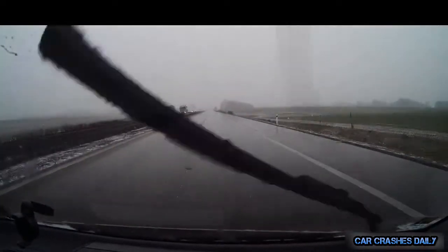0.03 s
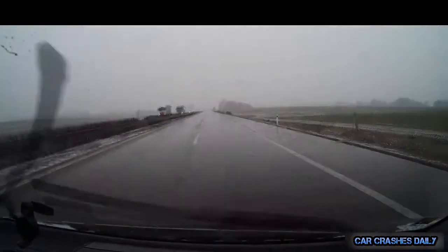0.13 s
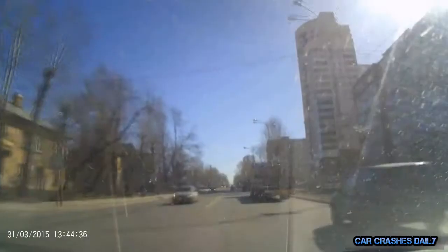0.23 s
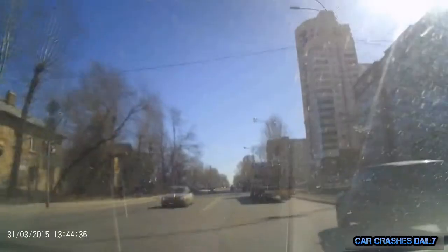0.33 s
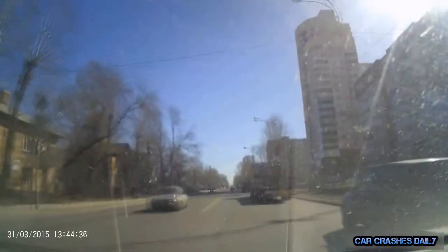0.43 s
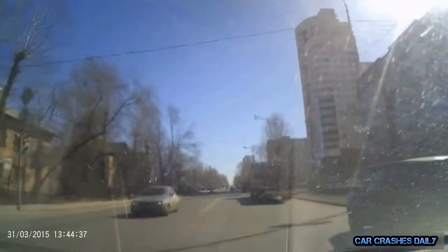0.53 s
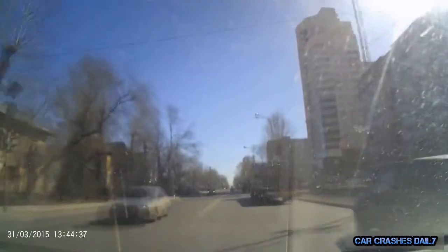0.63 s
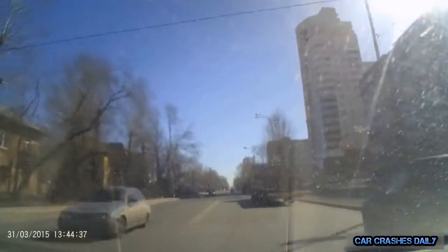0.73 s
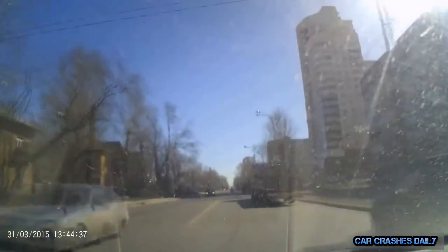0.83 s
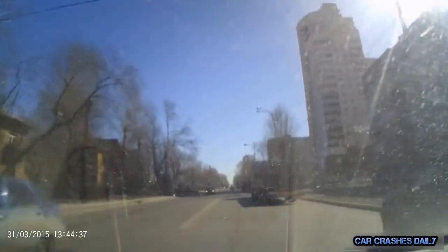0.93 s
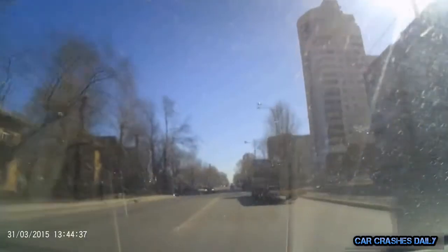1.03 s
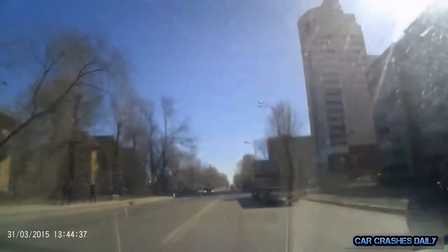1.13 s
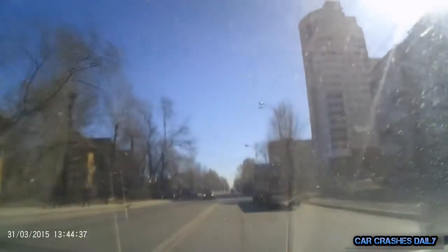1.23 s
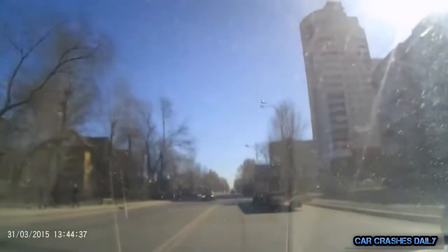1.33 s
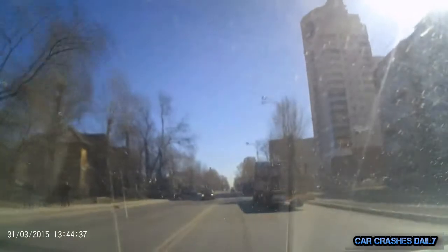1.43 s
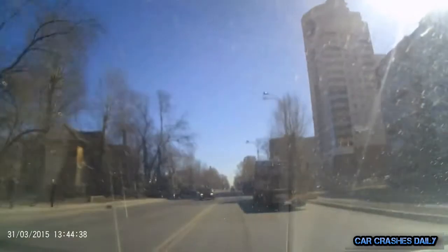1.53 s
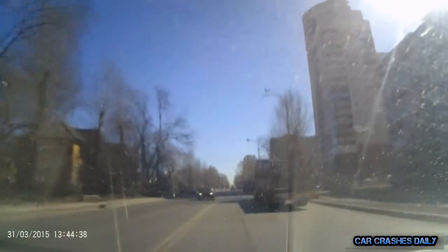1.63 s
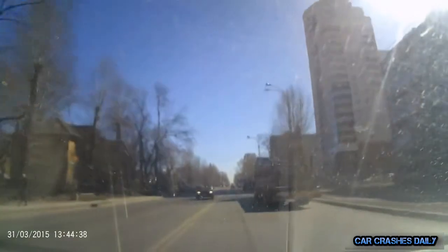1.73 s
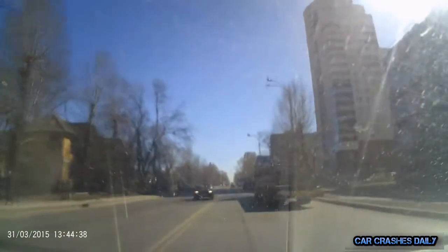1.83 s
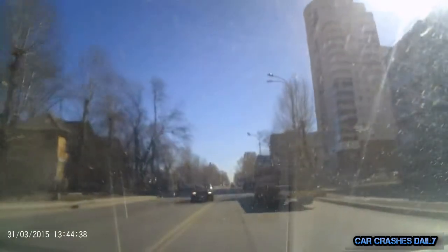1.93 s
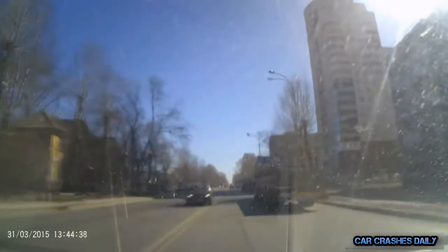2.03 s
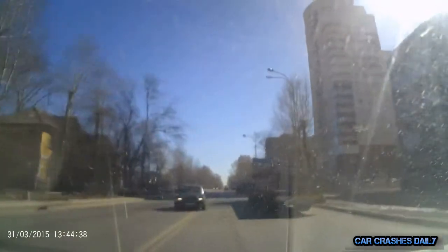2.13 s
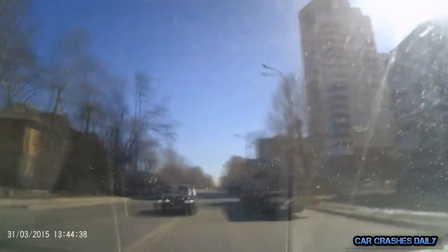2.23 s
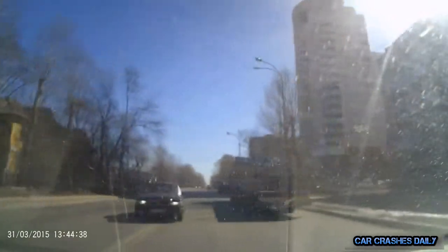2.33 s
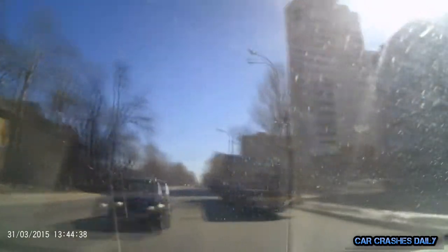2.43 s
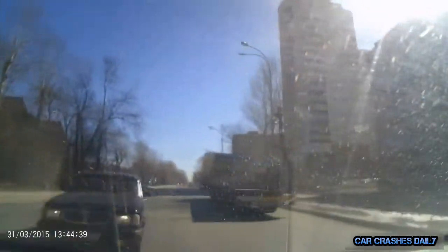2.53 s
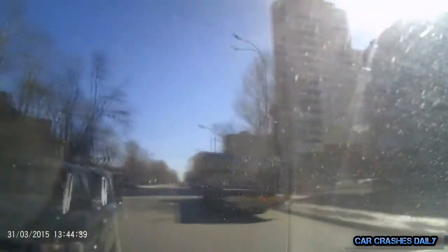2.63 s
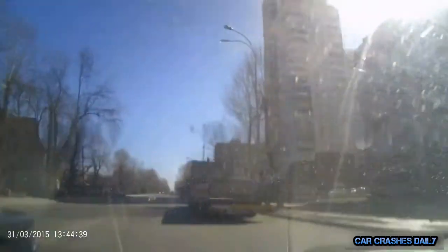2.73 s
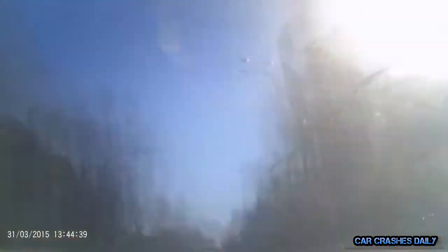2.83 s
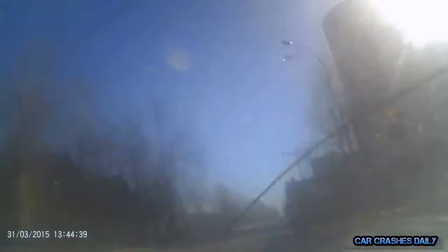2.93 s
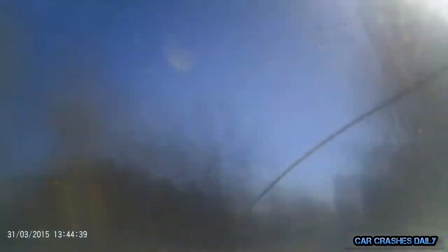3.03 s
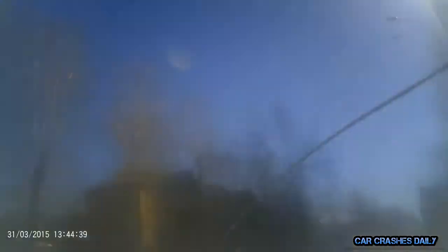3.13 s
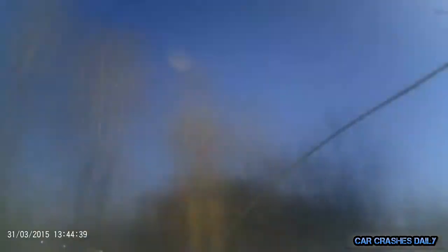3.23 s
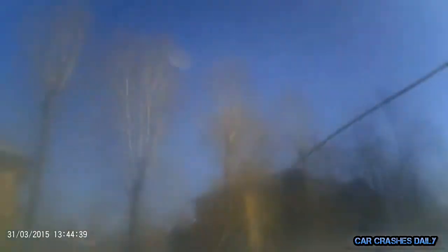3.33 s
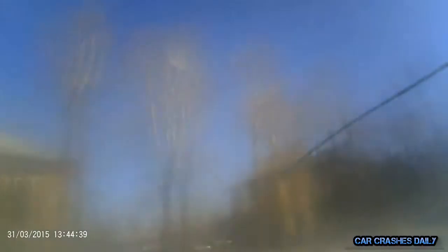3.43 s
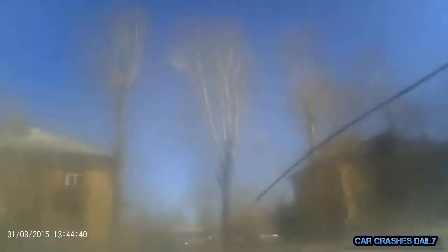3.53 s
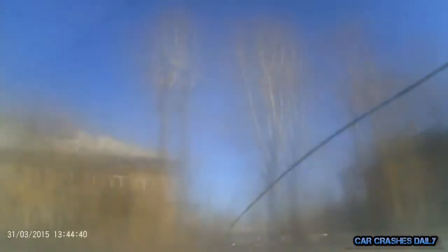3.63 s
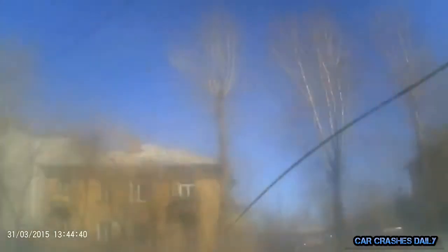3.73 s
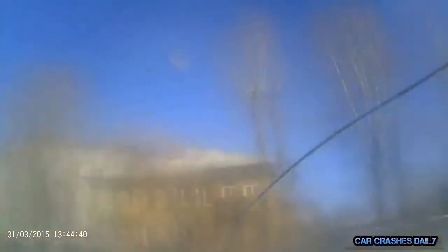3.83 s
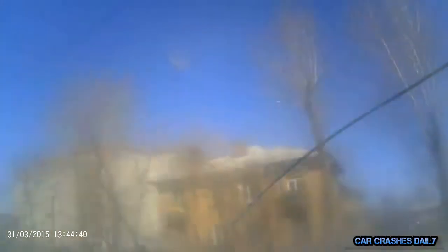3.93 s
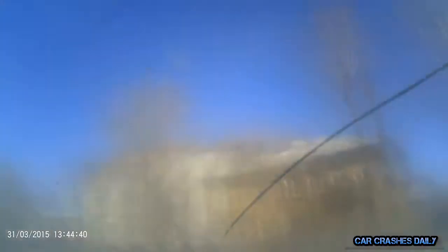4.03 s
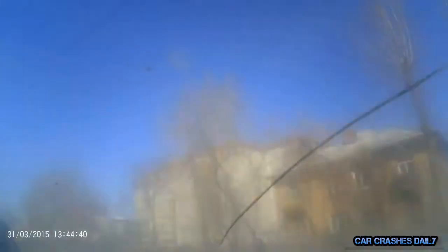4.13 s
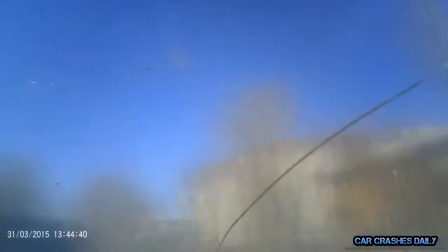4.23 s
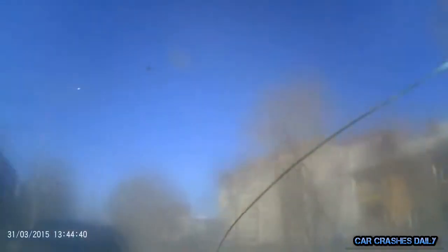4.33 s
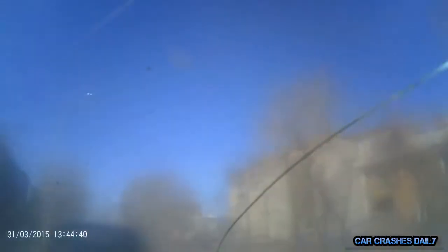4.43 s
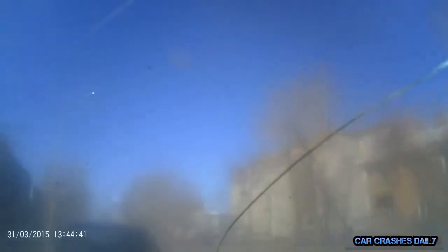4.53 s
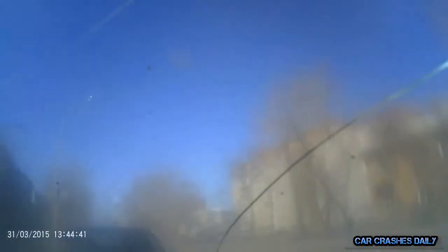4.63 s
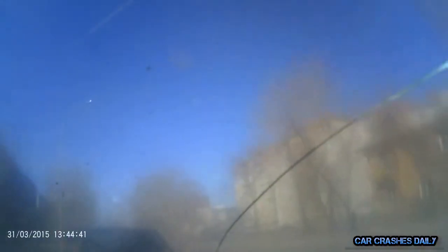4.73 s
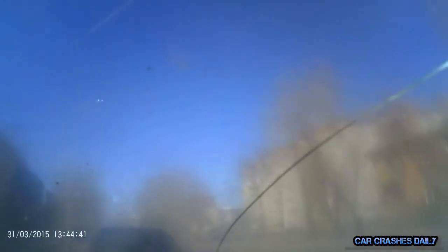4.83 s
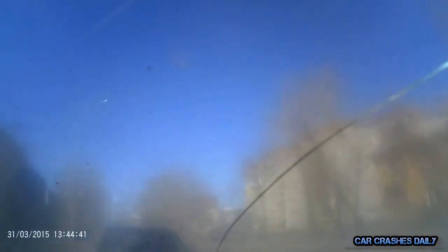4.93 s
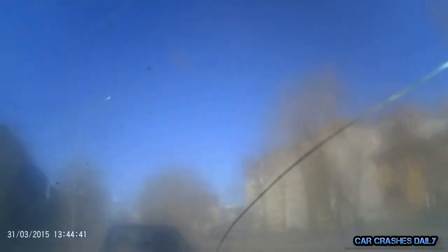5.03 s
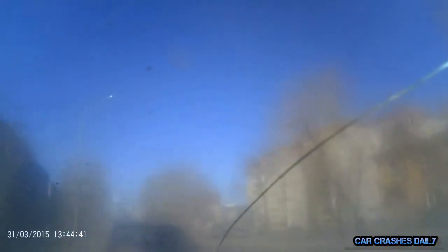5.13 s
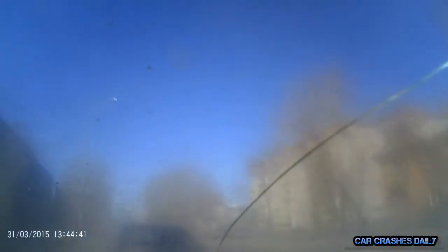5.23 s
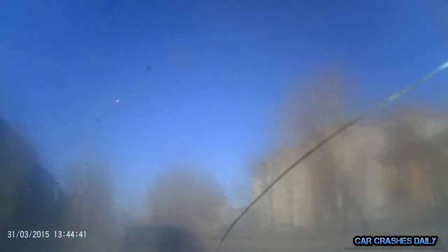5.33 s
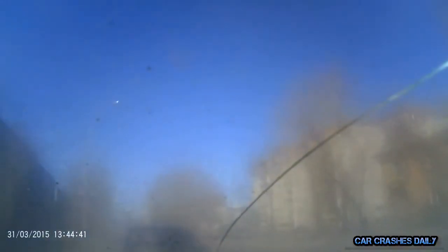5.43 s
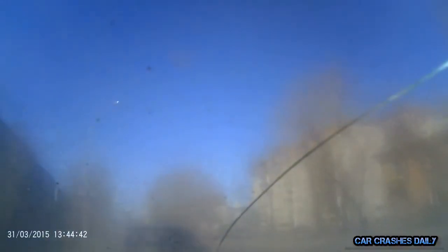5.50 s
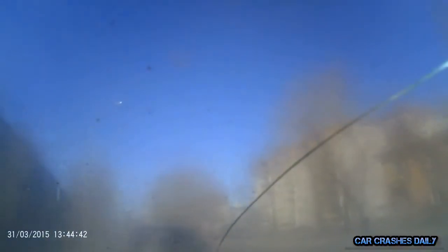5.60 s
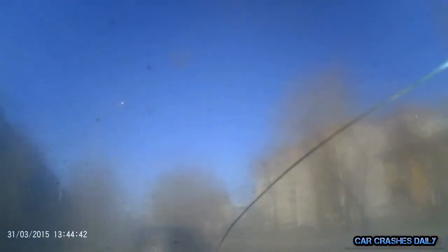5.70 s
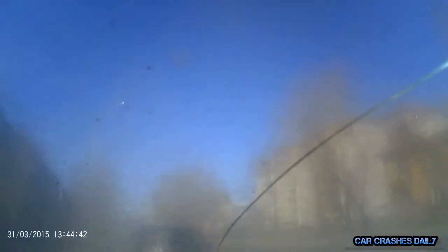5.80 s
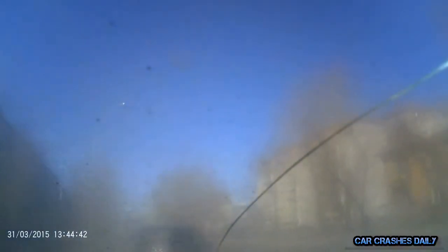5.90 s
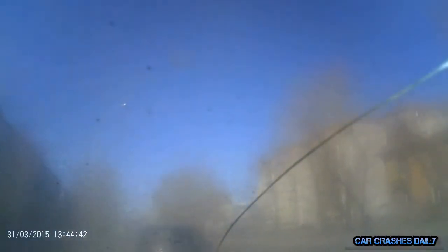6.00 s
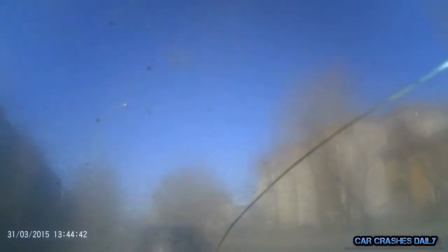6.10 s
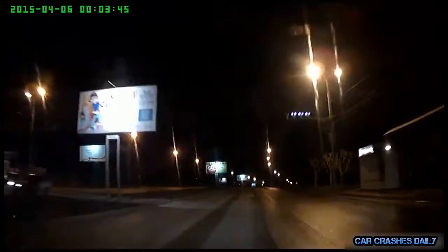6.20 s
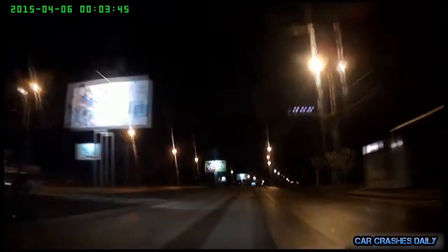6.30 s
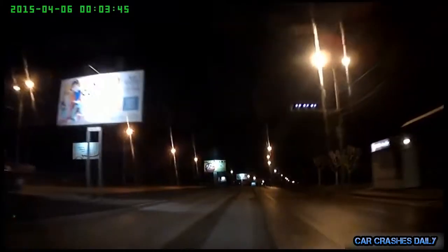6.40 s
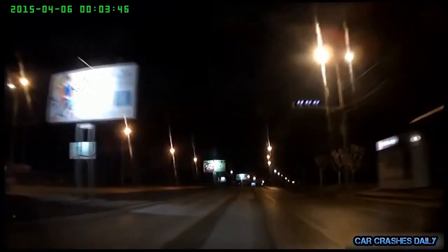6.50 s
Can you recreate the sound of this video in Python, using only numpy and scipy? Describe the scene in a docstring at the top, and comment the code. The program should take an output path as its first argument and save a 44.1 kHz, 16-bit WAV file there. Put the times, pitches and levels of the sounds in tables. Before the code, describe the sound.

From about 0.3 seconds, a low, steady tyre roar fills the cabin of a moving car, with a faint engine hum and gear whine. At 2.5 seconds comes a head-on collision: two crushing blows of buckling metal in quick succession, so loud that the microphone distorts. From 2.8 seconds the car spins, its body rocking with a deep judder as panels scrape and glass and trim clack and tinkle down, the glass thickest near 3.8 seconds. Hoarse tyre squeals, each falling in pitch, run from 3 to 4.4 seconds. Heavy thumps and short grinds of the underside continue until about 5 seconds, with a hard jolt near 4.4, followed by dry chattering trim. As the clatter fades, the engine grows louder around 5 seconds, then sinks in pitch. A soft rush rises from 5.5 seconds, and everything cuts off at 6.3 seconds.

```python
"""A town street, heard from behind the windscreen of a moving car that is hit head-on.
Tyres roar and the engine hums until two crushing blows overload the microphone. The car spins on
squealing tyres, its body rocking, thumping and scraping while glass and trim rattle down.
These noises die away as it slows, and the engine, louder by now, runs down.
A soft background rush comes up as the microphone's level recovers after the crash."""
import sys
import numpy as np
from scipy import signal
from scipy.fft import rfft, irfft
from scipy.io import wavfile

SR = 44100
rng = np.random.default_rng(int(sys.argv[2]) if len(sys.argv) > 2 else 0)


def unload_wav(signal):
    """Save mono or channel-first audio to the path in sys.argv[1] as 16-bit WAV at rate SR, clipped to [-1, 1]."""
    wavfile.write(
        sys.argv[1],
        SR,
        np.round(np.clip(np.atleast_2d(signal).T, -1, 1) * 32767).astype(np.int16),
    )


N = 289296
T = np.arange(N) / SR
START_S, END_S = 0.315, 6.32
SPIN_S, SLOWS_S, REST_S = 2.773, 3.55, 6.42  # the car starts to spin, starts to slow, comes to rest

# Levels in a table are relative to each other. A spectrum says how strong each frequency is.
# Spectrum of tyre roar inside the car: f/Hz, level/dB
ROAD_SPECTRUM = [(18, 3), (69, 0), (137, -9), (162, -20), (220, -18.5), (261, -23.5), (376, -27),
                 (875, -35), (2620, -55.5), (10400, -80.5), (15000, -82)]
# Resonances of the cabin and the case around the microphone: f/Hz, width/Hz, level/dB
CABIN_RESONANCES = [(864, 24, 4), (1430, 180, 0), (3980, 280, 7), (9760, 2500, 18.5)]
# How fast the engine fires and how loud it is: t/s, f/Hz, level/dB
ENGINE_CURVE = [(0.3, 72.9, -41), (4.6, 79.8, -28.5), (4.87, 98.2, -20.5), (5.12, 102.5, -18.5),
                (5.3, 96.1, -25), (5.64, 97.4, -19.5), (5.98, 81.8, -24), (6.15, 75.86, -22.5),
                (6.32, 69.8, -21)]
# Engine harmonics (1, 2, 3... times the firing rate): level/dB
ENGINE_HARMONICS = [-27, -11, -16, -16, -22, -21.5]
# Bursts of buckling metal: t/s, length/s, level/dB, f/Hz above which the crunch fades
CRUNCHES = [(2.542, 0.006, 2, 860), (2.549, 0.0028, 3, 895), (2.555, 0.0017, -1.5, 900),
            (2.561, 0.0095, 9.5, 206), (2.576, 0.0014, -1.5, 1950), (2.582, 0.009, 8.5, 449),
            (2.659, 0.044, -4.5, 3660), (2.705, 0.024, -9, 3560), (2.724, 0.011, 0, 3580),
            (2.739, 0.0094, -6.5, 298)]
# Jolts of cabin air: t/s, length/s, pressure/full scale (negative is suction)
AIR_SURGES = [(2.544, 0.024, 2), (2.572, 0.009, -2.5), (2.58, 0.0072, 3.5), (2.586, 0.091, -1.38),
              (2.708, 0.048, 1.22), (2.744, 0.028, -1.93), (3.078, 0.0158, -2), (4.373, 0.02, -4.5)]
# Hard rocking on the springs: t/s, length/s, level/dB, f/Hz
BODY_HEAVES = [(2.75, 0.35, 1.5, 22.05), (3.03, 0.43, -5, 23.8), (4.116, 0.23, -2, 28.2),
               (4.321, 0.3, -0.5, 25.3)]
# Spectrum of the swaying body: f/Hz, level/dB
SWAY_SPECTRUM = [(14, -10.5), (22, -6), (29, -10.5), (42, -11.5), (65, -18.5), (110, -35.5)]
# The underside grinds over the ground: t/s, length/s, level/dB
GROUND_GRINDS = [(3.65, 0.02, -18), (4.05, 0.12, -19), (4.192, 0.13, -17), (4.651, 0.046, -17.5),
                 (4.798, 0.077, -18.5), (4.9, 0.11, -16), (5.221, 0.098, -24)]
# Spectrum of the rumbling floor: f/Hz, level/dB
RUMBLE_SPECTRUM = [(70, -1), (140, 5.5), (220, -2), (350, -0.5), (470, -5), (900, -21)]
# Harmonics of the underside's groan: level/dB
GROAN_HARMONICS = [1.5, 0.5, -3.5, -7]
# Spectrum of scraping panels: f/Hz, level/dB
SCRAPE_SPECTRUM = [(500, -0.5), (850, 4.5), (1150, -0.5), (1550, 2.5), (1950, -5), (2800, -16.5)]
# Spectrum of showering glass: f/Hz, level/dB
GLASS_SPECTRUM = [(1800, -16.5), (3500, -2.5), (5400, -8.5), (7200, -13), (9500, -6), (11000, -18.5),
                  (15000, -24.5)]
# The body and wheels land: t/s, level/dB, added clatter/dB
LANDINGS = [(2.774, -7.5, 2), (3.095, -4.5, 3), (3.682, -2.5, -2), (4.081, -3.5, 0.5), (4.103, -3.5, -1.5),
            (4.351, -4, 5.5), (4.37, -16, 14), (4.463, -11, 9.5), (4.664, 0, -11), (4.908, -8, -5),
            (4.96, -10, 1.5)]
# Notes the body shell rings at: f/Hz, level/dB, time to fade by 60 dB/s
SHELL_NOTES = [(117, -5.5, 0.56), (146.3, 1.5, 0.33), (236.4, -1, 0.12), (302, -5, 0.17),
               (423, -1.5, 0.069), (567, -10, 0.072)]
# Glass and trim strike: t/s, level/dB, ring f/Hz
PIECE_HITS = [(2.7792, 2.5, 3840), (2.83, 0.5, 2930), (2.878, -2.5, 3630), (2.9306, 0.5, 4116),
              (2.933, 0, 2640), (2.961, -7.5, 5480), (3.1651, -1.5, 4160), (3.2, 1, 2420),
              (3.204, -2, 4030), (3.471, -6, 4080), (3.563, -4, 3440), (3.6884, 0, 3080),
              (3.712, -0.5, 3240), (3.794, 2.5, 3076), (3.8247, -2, 3200), (3.8612, 2, 2940),
              (3.891, 1.5, 2990), (3.9557, -3.5, 4000), (4.083, -7, 2154), (4.4, -10, 2930),
              (4.496, -7.5, 3660), (4.622, -14, 5470), (4.818, -13, 3160), (4.8567, -10.5, 2360),
              (4.9674, -9.5, 3190), (5.1373, -18.5, 2368), (5.2282, -10.5, 2350), (5.5092, -24, 2426),
              (5.556, -19, 2830), (5.611, -24, 2780), (5.8584, -25, 3247)]
# Notes of one loose piece: multiple of its ring frequency, level/dB
PIECE_NOTES = [(0.722, -0.5), (1.001, 9.5), (1.3, -19), (1.851, -10)]
# Tyres slide sideways: t/s, length/s, level/dB, starting f/Hz
SKIDS = [(2.967, 0.55, -27, 1011), (3.149, 0.39, -25.5, 856), (3.543, 0.42, -29, 902),
         (4.024, 0.33, -31.5, 672)]
# Harmonics of a squeal: level/dB
SQUEAL_HARMONICS = [8, -1.5]
# Runs of chattering trim: t/s, length/s, level/dB
RATTLE_RUNS = [(4.379, 0.328, -37.5), (4.795, 0.206, -37.5), (5.027, .2, -44)]
# Spectrum of that chatter: f/Hz, level/dB
RATTLE_SPECTRUM = [(1200, 3.5), (4200, 6), (9800, -3.5), (13000, -18)]
# Spectrum of the soft background rush: f/Hz, level/dB
RUSH_SPECTRUM = [(60, 5), (400, -2), (1500, -12), (2400, -22), (4000, -23), (6500, -33),
                 (9500, -31), (12000, -43)]


def gain(db):
    """Turn decibels into a number to multiply by."""
    return 10 ** (np.asarray(db) / 20)


def unit(x):
    """Scale a sound to an average (rms) strength of 1."""
    return x / np.sqrt(np.mean(x ** 2) + 1e-18)


def between(start, end, ramp_s):
    """Fade in from the start time and out by the end time."""
    return np.clip((T - start) / ramp_s, 0, 1) * np.clip((end - T) / ramp_s, 0, 1)


def colour(x, spectrum):
    """Filter a sound by a spectrum, dropping 24 dB per octave beyond its ends; strength 1."""
    hz, db = np.transpose(spectrum)
    octave = np.log2(np.maximum(np.arange(N // 2 + 1) * SR / N, 1))
    outside = np.maximum(np.log2(hz[0]) - octave, 0) + np.maximum(octave - np.log2(hz[-1]), 0)
    response = gain(np.maximum(np.interp(octave, np.log2(hz), db) - 24 * outside, -90))
    # make the filter ring after each click, never before it
    cepstrum = irfft(np.log(response), N)
    cepstrum[1:N // 2] *= 2
    cepstrum[N // 2 + 1:] = 0
    return unit(irfft(rfft(x) * np.exp(rfft(cepstrum)), N))


def band(x, hz, width):
    """A resonance: keep the frequencies near one pitch."""
    return signal.lfilter(*signal.iirpeak(min(hz, SR / 3), hz / min(width, SR / 4), fs=SR), x)


def lowpass(x, hz, order=1):
    """Dull everything above a frequency."""
    return signal.sosfilt(signal.butter(order, min(hz, SR / 3), fs=SR, output="sos"), x)


def wobble(rate):
    """Glide to a new random value, about 1 in size, `rate` times a second."""
    return np.interp(T * rate, np.arange(N // 16), rng.standard_normal(N // 16))


def clicks(rate, spread_db):
    """Tiny contacts of uneven strength at random moments, `rate` a second."""
    out = np.zeros(N)
    moment, sign, force = rng.random((N // 8, 3))[:int(rate * N / SR)].T
    out[(moment * N).astype(int)] = np.sign(sign - .5) * gain(spread_db * np.minimum(-np.log(force), 4))
    return out


def add(out, s, sound):
    """Mix a sound in at `s` seconds."""
    i = int(s * SR)
    out[i:i + len(sound)] += sound[:N - i]


def fade(t, t60):
    """Die away by 60 dB every `t60` seconds."""
    return np.exp(-np.log(1000) * t / t60)


def tone(hz, harmonics_db):
    """A pitched vibration made of harmonics; strength 1."""
    phase = 2 * np.pi * np.cumsum(hz) / SR
    return unit(sum(gain(db) * np.sin(k * phase) for k, db in enumerate(harmonics_db, 1)))


def spin_level(db, attack_s, fall_db_per_s):
    """Loudness of a noise in the spin: it rises, holds, then dies away as the car slows."""
    gate = np.clip((T - SPIN_S) / attack_s, 0, 1) * np.clip((REST_S - T) / 0.46, 0, 1)
    return gate * gain(db - fall_db_per_s * np.maximum(T - SLOWS_S, 0))


def grind_level(db):
    """Loudness of a noise made only while the underside touches the ground."""
    return sum(gain(db + grind_db) * between(s, s + length, ramp_s=0.0033)
               for s, length, grind_db in GROUND_GRINDS)


def pieces(low_hz, high_hz, count, rate, width):
    """Loose parts each ring at their own pitch when struck; all settle before the car stops."""
    pitches = np.geomspace(low_hz, high_hz, count) * (1 + .03 * rng.standard_normal(count))
    ringing = unit(sum(band(clicks(rate, spread_db=6), hz, width) for hz in pitches))
    return ringing * between(START_S, 5.49, ramp_s=0.83)


def road_roar(level_db=-18):
    """Rolling tyres boom in the cabin until the last crunch of the crash."""
    noise = colour(rng.standard_normal(N), ROAD_SPECTRUM)
    ringing = sum(gain(db) * band(noise, hz, width) for hz, width, db in CABIN_RESONANCES)
    return unit(noise + ringing) * gain(level_db + wobble(5.67)) * (T < CRUNCHES[-1][0])


def gearbox_whine(hz=376.4, db=-47):
    """The gears whine faintly until the crash."""
    return gain(db + 2 * wobble(14)) * tone(hz * (1 + 0.0083 * wobble(22)), [0]) * (T < CRUNCHES[0][0])


def thin_hiss(hz=7150, width=1100, db=-62):
    """A thin hiss comes and goes in quick flutters until the crash."""
    hiss = unit(band(band(rng.standard_normal(N), hz, width), hz, width))
    return gain(db) * hiss * np.clip(2 * wobble(28), 0, 1) * (T < CRUNCHES[0][0])


def engine(boom_hz=146, boom_width_hz=32, boom_db=16):
    """Firing cylinders hum; each harmonic swells near the pitch at which the cabin booms."""
    times, firing_hz, levels = np.transpose(ENGINE_CURVE)
    hz = np.interp(T, times, firing_hz)
    level_db = np.interp(T, times, levels)
    phase = 2 * np.pi * np.cumsum(hz * (1 + 0.0056 * wobble(25))) / SR
    out = 0
    for k, db in enumerate(ENGINE_HARMONICS, 1):
        boost_db = boom_db / (1 + ((k * hz - boom_hz) / boom_width_hz) ** 2)
        out += gain(level_db + db + boost_db) * (1 + .15 * wobble(30)) * np.sin(k * phase)
    return out


def collision(tail_db=-17, grain_db=4.0):
    """Sheet metal buckles in grainy bursts that rattle on briefly; the squeezed cabin air surges."""
    out, t = np.zeros(N), T[:SR // 10]
    for s, length, db, corner_hz in CRUNCHES:
        noise = rng.standard_normal((2, len(t)))
        crunch = lowpass(lowpass(noise[0], corner_hz), 4 * corner_hz)[:int(length * SR)]
        add(out, s, gain(db) * unit(crunch - crunch.mean()) * signal.windows.tukey(len(crunch), .2))
        add(out, s, gain(tail_db) * unit(lowpass(noise[1], hz=2537)) * fade(t, t60=0.22))
    out *= gain(grain_db * wobble(260))
    for s, length, pressure in AIR_SURGES:
        push = signal.windows.tukey(int(length * SR), .15)
        add(out, s, pressure * push * np.linspace(1, .3, len(push)))
    return out


def heaves(attack_s=0.018, release_s=0.24, judder_db=-8):
    """Each hard shove sets the body rocking and juddering, which pumps the cabin air."""
    out, t = np.zeros(N), T[:SR]
    for s, length, db, hz in BODY_HEAVES:
        envelope = np.clip(t / attack_s, 0, 1) * np.clip((length - t) / release_s, 0, 1)
        judder = unit(lowpass(rng.standard_normal(SR), hz=75, order=4))
        add(out, s, gain(db) * envelope * (gain(judder_db) * judder - np.sin(2 * np.pi * hz * t)))
    return out


def body_sway():
    """The body sways on its springs, whose limited travel keeps the swings alike in size."""
    swing = signal.hilbert(colour(rng.standard_normal(N), SWAY_SPECTRUM))
    sway = unit(swing.real / (np.abs(swing) + .5))
    return sway * spin_level(db=-13, attack_s=0.019, fall_db_per_s=1.0)


def underside(groan_hz=155):
    """The floor rumbles, and groans as it sticks and slips on the ground."""
    rumble = colour(clicks(rate=900, spread_db=2.5), RUMBLE_SPECTRUM)
    groan = tone(groan_hz * (1 + 0.02622 * wobble(12) + 0.0221 * wobble(150)), GROAN_HARMONICS)
    level = spin_level(db=-23.5, attack_s=0.14, fall_db_per_s=1.59)
    return rumble * np.hypot(level, grind_level(db=-1)) + groan * grind_level(db=-5)


def panel_scrape(grit, shake):
    """Bent panels scrape: many small contacts make the metal ring."""
    metal = pieces(483, 1756, count=20, rate=100, width=76)
    scrape = colour((metal + grit) * shake, SCRAPE_SPECTRUM)
    level = spin_level(db=-21.5, attack_s=0.25, fall_db_per_s=6.45)
    return scrape * np.hypot(level, grind_level(db=-10))


def glass_shower(grit, shake, peak_s=3.75, swell_s=0.18, swell_db=3):
    """Bits of glass tinkle down, loudest in the middle of the spin."""
    shards = 1.93 * pieces(2586, 13500, count=36, rate=110, width=50)
    glass = colour((shards + grit) * shake * gain(3.6 * wobble(130)), GLASS_SPECTRUM)
    swell = gain(swell_db * np.exp(-((T - peak_s) / swell_s) ** 2))
    level = swell * spin_level(db=-28, attack_s=0.24, fall_db_per_s=12.9)
    return glass * np.hypot(level, grind_level(db=-28))


def panel_buzz(hz=880, width=60):
    """A loose panel hums at its own pitch for as long as the car shakes."""
    hum = unit(band(band(rng.standard_normal(N), hz, width), hz, width))
    return hum * spin_level(db=-40, attack_s=0.12, fall_db_per_s=1.5)


def thumps(gain_db=-9):
    """Heavy landings ring the body shell and make the dashboard clatter."""
    out, t = np.zeros(N), T[:SR // 2]
    for s, db, clatter_db in LANDINGS:
        chance = rng.standard_normal((len(SHELL_NOTES), 2))
        shell = sum(gain(note_db + 2 * louder) * np.sin(2 * np.pi * hz * (1 + 0.055 * higher) * t)
                    * fade(t, t60) for (hz, note_db, t60), (louder, higher) in zip(SHELL_NOTES, chance))
        noise = band(rng.standard_normal(len(t)), hz=610, width=630)
        clatter = unit(lowpass(noise, hz=2140, order=2)) * fade(t, t60=0.088)
        onset = 1 - fade(t, t60=0.0006)
        add(out, s, gain(db + gain_db) * (shell + gain(clatter_db) * clatter) * onset)
    return out


def clacks(gain_db=-15.5, knock_db=-5, glass_above_hz=4000, glass_t60=.14, trim_t60=0.037):
    """A loose piece hits a panel: it cracks and rings (glass longer than trim), and the panel knocks."""
    out, t = np.zeros(N), T[:SR // 4]
    for s, db, ring_hz in PIECE_HITS:
        noise = rng.standard_normal((2 + len(PIECE_NOTES), len(t)))
        splinters = noise[0] * np.abs(noise[0])
        crack = unit(band(splinters, hz=2510, width=3500)) * fade(t, t60=0.064)
        panel = band(noise[1], hz=1460, width=300)
        knock = unit(lowpass(panel, hz=2010, order=2)) * fade(t, t60=0.11)
        notes = sum(gain(note_db) * np.sin(2 * np.pi * np.cumsum(ring_hz * (ratio + 0.14 * rough)) / SR)
                    for (ratio, note_db), rough in zip(PIECE_NOTES, noise[2:]))
        ring = unit(notes) * fade(t, glass_t60 if ring_hz > glass_above_hz else trim_t60)
        add(out, s, gain(db + gain_db) * (crack + 1.14 * ring + gain(knock_db) * knock))
    return lowpass(out, hz=11000)


def tyre_squeals(sink_hz_per_s=480, rear_ratio=1.28, flutter_db=8.5):
    """Front and rear treads grip and slip: two hoarse squeals that sink as the slide loses speed."""
    out = 0
    for s, length, db, hz in SKIDS:
        pitch = hz - sink_hz_per_s * np.clip(T - s, 0, length)
        squeal = 0
        for ratio in (1, rear_ratio):
            waver = 1 + 0.027 * wobble(22) + .038 * wobble(400)
            squeal += tone(ratio * pitch * waver, SQUEAL_HARMONICS) * gain(flutter_db * wobble(35))
        out += gain(db) * unit(squeal) * between(s, s + length, ramp_s=0.065)
    return out


def trim_rattles(gap_s=.019, scatter_db=4.0):
    """Loose trim chatters in runs of dry, uneven ticks as the car bumps along."""
    ticks = np.zeros(N)
    spacing, force = rng.standard_normal((N // 100, 2)).T
    for s, db in zip(np.cumsum(gap_s * np.exp(.5 * spacing)), scatter_db * force):
        if s < END_S:
            add(ticks, s, gain(db) * fade(T[:SR // 10], t60=0.043))
    runs = sum(gain(db) * between(s, s + length, ramp_s=0.012) for s, length, db in RATTLE_RUNS)
    return colour(ticks * rng.standard_normal(N), RATTLE_SPECTRUM) * runs


def background_rush(db=-32):
    """A soft background rush comes up as the microphone's level recovers after the crash."""
    return colour(rng.standard_normal(N), RUSH_SPECTRUM) * gain(db) * between(5.47, 7.01, ramp_s=0.94)


def scene():
    """Everything that reaches the windscreen, in one channel."""
    background = road_roar() + background_rush() + gearbox_whine() + thin_hiss() + engine()
    crash = collision() + body_sway()
    shake = gain(4 * np.tanh(wobble(60)))  # each jolt shakes panels and glass together
    grit = 2.95 * unit(clicks(rate=5600, spread_db=-1.5))
    crash += underside() + panel_scrape(grit, shake) + glass_shower(grit, shake)
    crash += tyre_squeals() + clacks() + trim_rattles() + thumps() + heaves() + panel_buzz()
    return ((background + crash) * between(START_S, END_S, ramp_s=0.015))[None]


def record(dry, limit=0.71, flip_above=5.3, leak=0.062, sag_hz=6, top_hz=14800):
    """The microphone's amplifier sticks at its limit, and flips over when pushed far beyond it."""
    x = np.where(dry > flip_above, -limit, np.clip(dry, -limit, limit))
    x = x + leak * (dry - lowpass(dry, hz=600))  # a little treble still seeps through
    x = signal.sosfilt(signal.butter(1, sag_hz, "high", fs=SR, output="sos"), x)  # a held level sags
    x = x / (1 + (x / .76) ** 6) ** (1 / 6)  # the next stage rounds the peaks
    return signal.sosfilt(signal.ellip(8, .2, 70, top_hz, fs=SR, output="sos"), x)


dry = scene()
out = record(dry)
unload_wav(out)
```